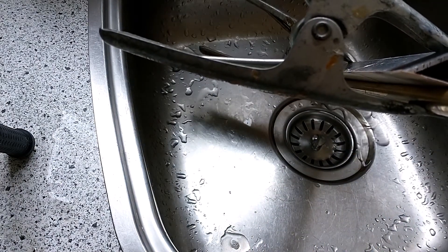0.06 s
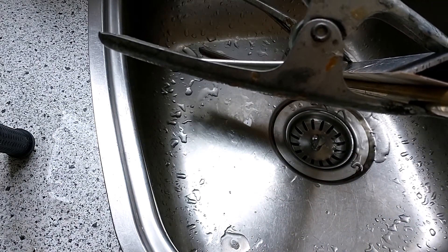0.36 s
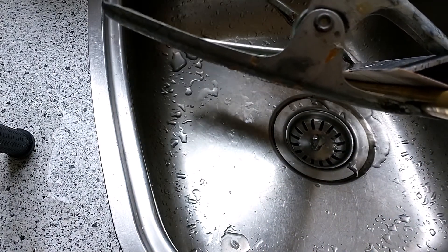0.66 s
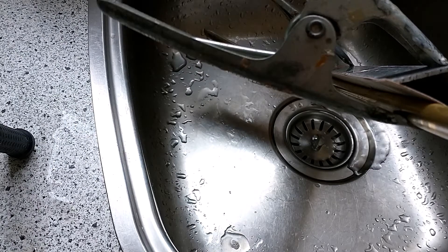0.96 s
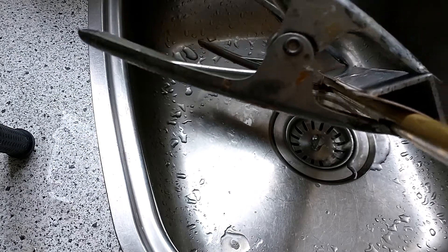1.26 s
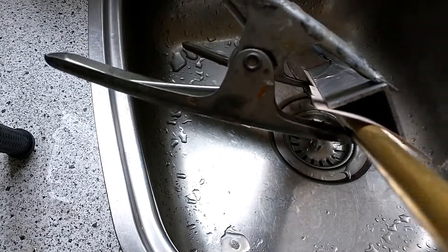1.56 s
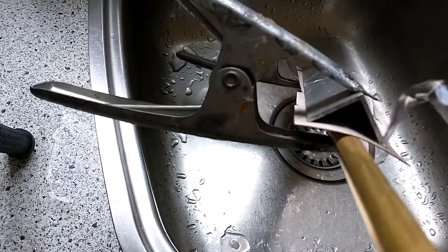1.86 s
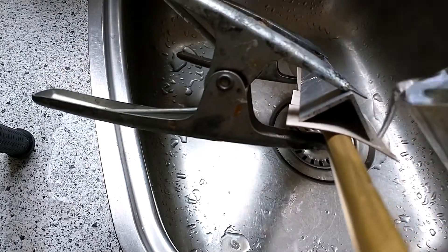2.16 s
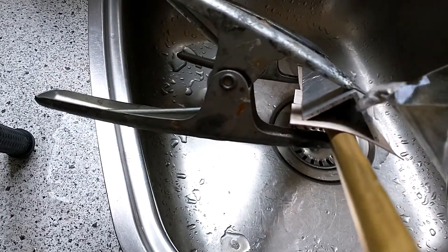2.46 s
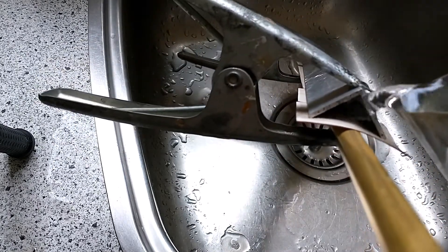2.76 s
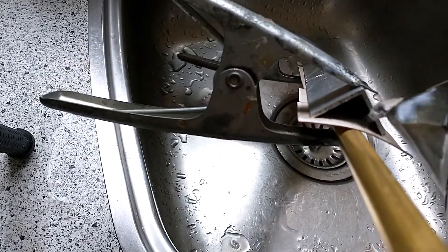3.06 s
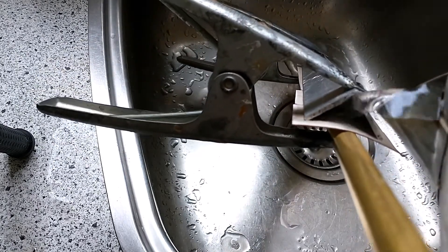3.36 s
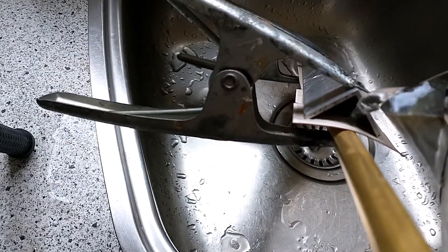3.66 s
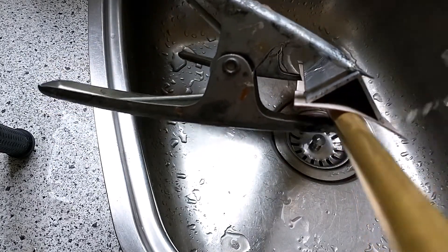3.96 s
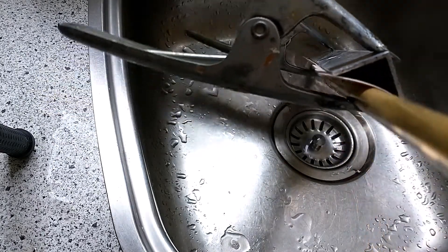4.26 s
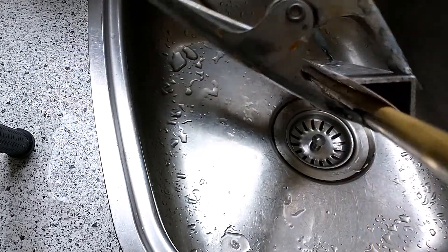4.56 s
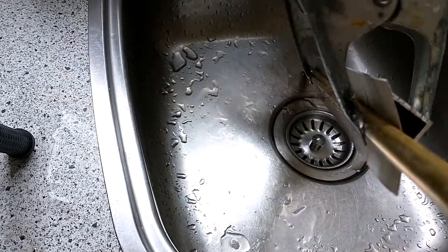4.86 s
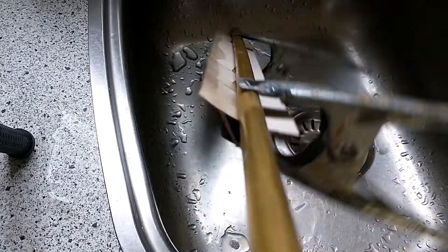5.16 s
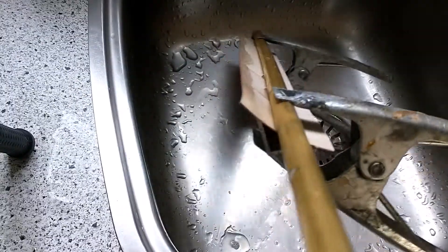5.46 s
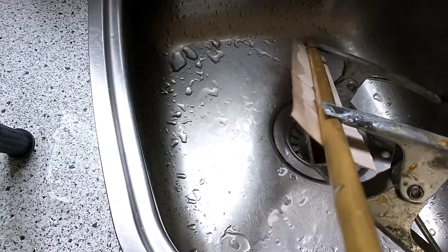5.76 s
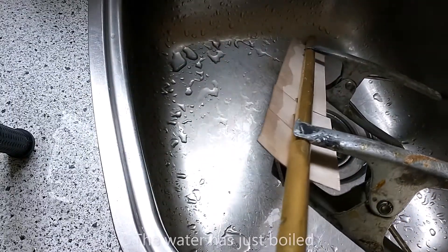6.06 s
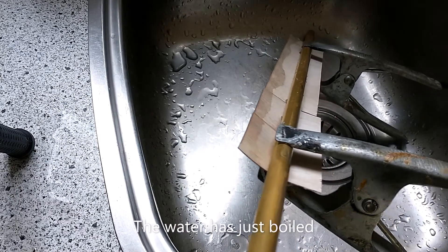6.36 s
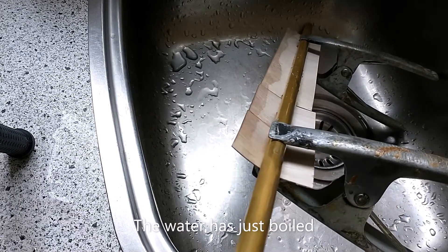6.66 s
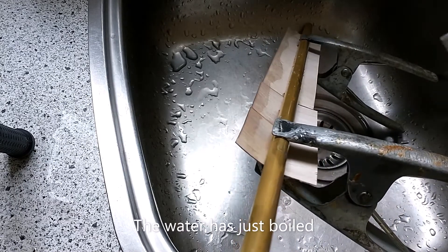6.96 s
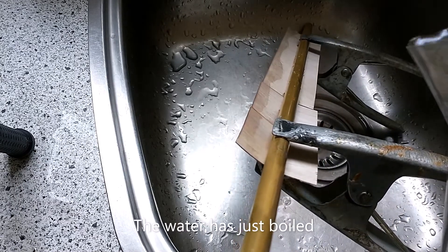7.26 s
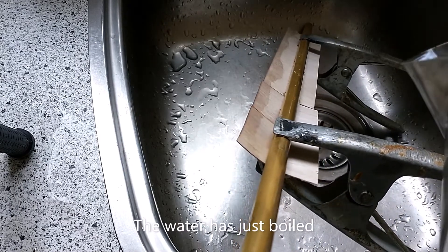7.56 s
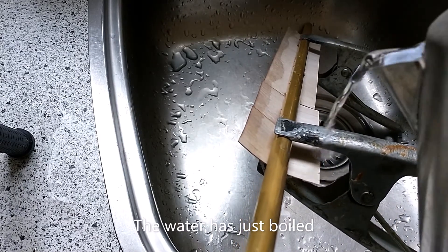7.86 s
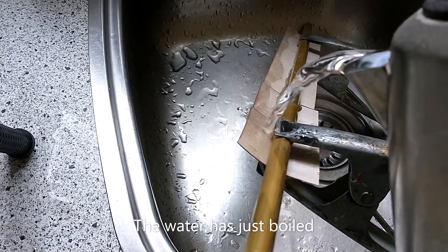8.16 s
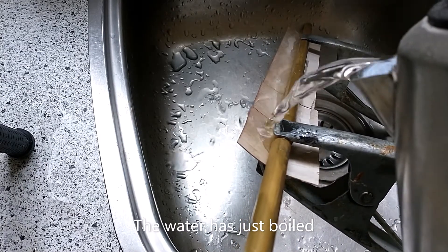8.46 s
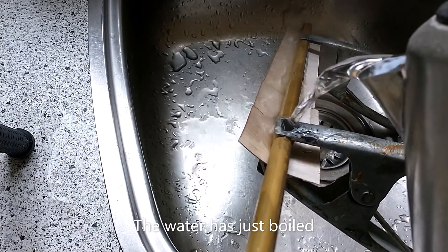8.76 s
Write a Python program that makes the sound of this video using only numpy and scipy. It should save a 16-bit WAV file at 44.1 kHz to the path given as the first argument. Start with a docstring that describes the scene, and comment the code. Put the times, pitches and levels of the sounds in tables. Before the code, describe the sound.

Heard close up at a steel kitchen sink, quiet drips and small splashes tick over a faint hum. Midway, a short scrape leads into a loud, clattering clank as a metal clamp and brass tube land, ringing the basin. A thin sliding squeal, a few lighter knocks and a brief drag follow. Soft dripping carries on, joined at the end by a faint fizz of poured water and a dull knock.

```python
"""Water drips and patters in a steel kitchen sink over a faint, dwindling hum. Near 5 s a steel spring
clamp holding a brass tube scrapes along the wall and drops in with a loud clank that rings the basin
and the tube. It slides with a thin squeal, rocks three times and drags to rest just after 6 s.
The water patters on; near the end a fresh pour fizzes and one dull knock sounds."""
import sys
import numpy as np
from scipy import signal
from scipy.fft import rfft, irfft, next_fast_len
from scipy.io import wavfile
from scipy.ndimage import map_coordinates

SR = 44100
rng = np.random.default_rng(int(sys.argv[2]) if len(sys.argv) > 2 else 0)


def generate_wav(signal):
    """Clip the signal to [-1, 1] and save it as 16-bit WAV at the path in sys.argv[1]."""
    frames = np.transpose(np.atleast_2d(signal))
    scaled = np.clip(frames, -1, 1) * 32767
    pcm = np.round(scaled).astype(np.int16)
    wavfile.write(sys.argv[1], SR, pcm)


N = 396868

# A mode is one note an object rings at; its ring time is how long it takes to fade by 60 dB.
# Levels in the tables are relative. Modes: (pitch [Hz], level [dB], ring time [s])
HOLLOW_MODES = [(234.9, -4, 0.31), (316, -11, 0.56), (433, -6.5, 0.23), (588, -2.5, 0.12), (682, 0.5, .12),
                (787.4, -12.5, 0.76), (884, -1.5, 0.17), (932, -3, 0.051)]  # the hollow of the basin
BASIN_MODES = [(88.6, -16.5, 0.96), (107, -2.5, .34), (167, -2, .5), (195.5, -5.5, 0.31), (244.2, -3, 0.5),
               (319.8, -1, .4), (384.3, -1, 0.21), (595, -8.5, 0.73), (730, -10, 0.57), (890.3, -15, .4),
               (928, -10, 0.26), (1036, -9, .7), (1041, -14.5, 0.55), (1316, -6, 0.44), (1620, -14.5, .4)]  # the basin's strongest notes
TUBE_MODES = [(1830, -11, .45), (2245, -11, .45), (3066, -9, .38), (3225, -11, .38), (3495, -9, .38),
              (3784, -8, .35), (4058, -8, .4), (4112, -8, .5), (4325, -10, .42), (5034, -11, .42),
              (5238, -9, .45), (6498, -10, .35), (7434, -12, .33), (8322, 2, .36), (8385, -6, .35),
              (8902, -9, .38)]  # the brass tube's bright ring
CLAMP_MODES = [(894, -9, .1), (1054, -9, 0.037), (1430, -6, 0.1), (1623, -1, 0.067), (2670, -8.5, 0.07),
               (2870, -4.5, 0.059), (4110, -2.5, 0.04), (4610, -4.5, 0.023), (4810, -7, 0.055),
               (7300, 0, .012)]  # the clamp's jaws
WALL_MODES = [(653, -12, 0.062), (1020, -12, 0.11), (1610, -3, .015), (2340, -5, .04), (4600, -4, .013),
              (6800, -5.5, 0.051)]  # the rubbed wall
RASP_MODES = [(722, -4.5, 0.14), (1020, -6.5, 0.19), (4730, 5.5, .0136), (7045, -10.5, 0.11),
              (7700, -9, 0.035)]  # the rasp around the squeal
BOTTOM_MODES = [(236.4, -1.5, 0.31), (321, -0.5, 0.15), (436, -6.5, 0.21), (645, -2.5, 0.1),
                (892, 1, 0.063), (1351, 2.5, 0.1), (1615, 2.5, 0.04), (2590, -4.5, .05)]  # the bottom under the dragged load
# How strong each noise is from low to high: (frequency [Hz], level [dB])
DRUMMING_COLOUR = [(25, -15.5), (50, -15.5), (80, -8), (160, -4.5), (235, -0.5), (350, -6.5), (520, -12),
                   (660, -8.5), (750, -17.5), (900, -3.5), (1100, -23.5), (2000, -37), (4000, -81.5)]  # water drumming on steel
PATTER_COLOUR = [(590, -32), (1000, -4.5), (1120, -9.5), (1430, -10), (1840, -5), (2120, -11), (3360, -13),
                 (4040, -14), (6130, -13.5), (10100, -18), (15800, -30.5)]  # fine spurts of water
LIGHT_GRIT_COLOUR = [(120, -58), (200, -32), (294, -11.5), (393, -20.5), (439, -9), (788, -17),
                     (1040, -12.5), (1220, -15.5), (1550, -8.5), (5470, -19), (7070, -12), (15800, -26)]  # metal sliding lightly
HEAVY_GRIT_COLOUR = [(41, -36.5), (70, -20), (135, -48.5), (238, -4), (375, -20.5), (631, -6), (740, -19.5),
                     (908, -6), (1140, -17), (1330, -15.5), (7140, -22.5), (15800, -41)]  # metal sliding under load
SHEET_COLOUR = [(25, -36.5), (50, -24), (75, -0.5), (120, 7.5), (300, 2), (500, -5.5), (1200, -7.5),
                (2200, -0.5), (3800, 0), (5600, -4), (8200, -5.5), (11000, -8.5), (15500, -17.5)]  # the steel sheet's crowd of weaker modes
# How long that crowd rings: (frequency [Hz], ring time [s])
SHEET_RING_TIMES = [(100, 0.36), (400, 0.71), (1000, 0.91), (2500, .6), (5000, 0.49), (8000, 0.51),
                    (14000, 0.28)]
# How alike left and right sound: (frequency [Hz], likeness [0 to 1])
WATER_LIKENESS = [(60, 1), (130, 0.66), (290, 0.52), (640, 0.17), (1400, 0.4), (8000, .15)]
METAL_LIKENESS = [(60, .92), (290, 0.81), (640, .27), (1400, 0), (15000, 0.032)]
# Soft splashes: (peak time [s], level [dB], rise and fall time [s], pitch [Hz])
SPLASHES = [(1.32, -62, 0.076, 850), (1.942, -49, 0.02, 810), (1.94, -58, 0.078, 460),
            (3.86, -59, 0.053, 450), (4.23, -61.5, 0.098, 630), (8.297, -64, .036, 395),
            (8.638, -64, .03, 344), (8.853, -61.5, 0.011, 2250)]
# The loudest drops: (time [s], level [dB], pitch [Hz])
LOUD_DROPS = [(0.1452, -53, 4160), (0.314, -55, 2780), (0.384, -54, 3950), (1.135, -53.5, 6160),
              (1.366, -54, 2900), (1.541, -56.5, 4080), (1.8238, -53, 2350), (1.9883, -50.5, 4000),
              (2.3043, -55, 2970), (2.4604, -44.5, 5900), (2.815, -55.5, 3500), (3.089, -50.5, 3400),
              (7.3795, -60, 3590), (8.2142, -56, 3970)]
# Metal rubbing on steel, one row each for scrape, groan, last catch, slide, squeal and drag:
# (start [s], rise [s], hold [s], level [dB])
STROKES = [(4.695, 0.22, 0.037, -46), (4.825, 0.041, 0.0087, -55), (4.927, 0.014, 0.012, -49),
           (5.153, 0.28, 0.17, -52.5), (5.292, .11, .17, -50), (6.15, 0.095, 0.049, -48)]
# Blows on the basin: (time [s], level [dB], thud [dB], treble [dB], crack [dB],
# ring length [share of the free ring], clamp [dB], pitch of the struck spot [Hz])
BLOWS = [(1.9337, -60, -9, -27, 4, .5, -10, 810), (5.0253, -20, -6, 7.5, -5, 0.21, -8, 11600),
         (5.0446, -20.5, 4, 6.5, 1, 0.93, -21, 8180), (5.0477, -23.5, -2.5, -1.5, 28.5, 0.22, -5, 3504),
         (5.0579, -28, -4, -11, -1, 0.5, -12, 3500), (5.083, -31, 4, 1.5, -3, 0.46, -14, 8350),
         (5.1032, -25, -14, -14, 2, .25, 1, 4650), (5.166, -40.5, 12, 7, 5, 0.78, -10, 2560),
         (5.6326, -50.5, 2.5, 1, 17, 0.64, 0.5, 2670), (5.8087, -40.5, -4.5, 1.5, -2.5, 0.24, -7, 6660),
         (5.814, -48.5, 1, -0.5, -7, 0.52, 4.5, 860), (6.013, -51.5, 8.5, -2.5, 11, 0.54, -2, 445.8),
         (8.783, -49, 0.5, -24.5, -10, 0.49, -17, 458.5)]

DRUMMING_DB, DRUMMING_FADE_DB_PER_S = -62.5, 1.14
PATTER_DB, PATTER_FADE_DB_PER_S = -68, .5
DRIP_HZ, DRIP_SPREAD_OCTAVES, DROP_DULL_HZ = 3700, 0.84, 10800
RELEASE_DB_PER_S = 270.5  # how fast a stroke dies away
TOP_HZ = 15850


def amp(db):
    """Turn decibels into a gain to multiply by."""
    return 10 ** (np.asarray(db) / 20)


def unit(x):
    """Scale a signal to an average strength (rms) of 1."""
    return x / np.sqrt(np.mean(x ** 2) + 1e-20)


def along(points, hz):
    """Read between the rows of a (frequency, value) table, on an octave scale."""
    freqs, values = np.transpose(points)
    return np.interp(np.log(hz + 1), np.log(freqs), values)


def wobble(rate):
    """A smooth curve through `rate` random values a second."""
    return map_coordinates(rng.standard_normal(int(N * rate / SR) + 4), [np.arange(N) * rate / SR])


def filtered(x, response):
    """Multiply each frequency in x by response(frequency)."""
    size = x.shape[-1]
    padded = next_fast_len(size + 8192)
    return irfft(rfft(x, padded) * response(np.fft.rfftfreq(padded, 1 / SR)), padded)[..., :size]


def uneven(x, depth_db, width_hz):
    """Make some narrow bands louder than their neighbours, in a fixed random ripple."""
    knots = np.arange(0, SR, width_hz)
    level_db = depth_db * rng.standard_normal(4096)[:len(knots)]
    return unit(filtered(x, lambda hz: amp(np.interp(hz, knots, level_db) * hz / (hz + 500))))


def noise(colour):
    """Two unrelated noises shaped by a colour table."""
    white = uneven(rng.standard_normal((2, N)), depth_db=3.5, width_hz=59)
    return unit(filtered(white, lambda hz: amp(along(colour, hz))))


def band(size, centre_hz, slope_db):
    """Two noises that weaken by slope_db for each octave away from a centre."""
    white = rng.standard_normal((2, size))
    return unit(filtered(white, lambda hz: amp(-slope_db * abs(np.log2((hz + 1) / centre_hz)))))


def add(out, start, x):
    """Mix x into out from `start` seconds on."""
    part = out[:, max(round(start * SR), 0):][:, :x.shape[-1]]
    part += x[:, :part.shape[1]]


def ring(modes, scatter_db):
    """One second of fading modes, drawn afresh for two listening directions."""
    t = np.arange(SR) / SR
    return sum(amp(db + scatter_db * rng.standard_normal((2, 1))) * amp(-60 * t / ring_s)
               * np.sin(2 * np.pi * (hz * t + rng.random((2, 1)))) for hz, db, ring_s in modes)


def rubbed(modes, size=N):
    """Modes kept ringing by a random force."""
    force = rng.standard_normal((2, size + SR - 1))
    return unit(signal.fftconvolve(force, ring(modes, scatter_db=0), 'valid', axes=1))


def spread(pair, likeness):
    """Blend two signals into left and right: long waves reach both microphones alike."""
    turn = lambda hz: np.arccos(np.clip(along(likeness, hz), -1, 1)) / 2
    mid, side = filtered(pair, lambda hz: np.array([np.cos(turn(hz)), np.sin(turn(hz))]))
    return np.array([mid + side, mid - side])


def stroke(start, rise, hold, db, held_db_per_s=-50):
    """Loudness of one rub or pour: it builds evenly, drifts while held and dies away."""
    t = np.arange(N) / SR - start
    held = np.clip(t - rise, 0, hold)
    released = np.maximum(t - rise - hold, 0)
    return np.clip(t / rise, 0, 1) * amp(db + held_db_per_s * held - RELEASE_DB_PER_S * released)


def hum(drum_gain):
    """A faint, fuzzy hum stands in the basin's hollow, stronger while the water drums."""
    return (amp(-74.5) + amp(-5.5) * drum_gain) * rubbed(HOLLOW_MODES)


def running_water(drum_gain, patter_gain):
    """Water drums on the steel and patters in tiny spurts."""
    drumming = drum_gain * amp(1.1 * wobble(14)) * noise(DRUMMING_COLOUR)
    patter = patter_gain * amp(0.65 * wobble(25) + 1.3 * wobble(340)) * noise(PATTER_COLOUR)
    return drumming + patter


def fresh_pour():
    """Hot water lands on the metal and fizzes."""
    pour = stroke(start=7.6, rise=.6, hold=.85, db=-78.5, held_db_per_s=2)
    flicker = amp(1.5 * wobble(12) + 2.5 * wobble(200))
    return pour * flicker * band(N, centre_hz=10500, slope_db=13)


def spatter(patter_gain, count=700):
    """Droplets, mostly tiny, each ping for a few cycles; they fade with the patter."""
    out, t = np.zeros((2, N)), np.arange(SR // 100) / SR
    for when, pitch, size, phase in rng.random((count, 4)):
        hz = 1700 * 5.5 ** pitch
        ping = np.sin(2 * np.pi * (hz * t + np.array([[0], [phase]]))) * np.exp(-t * hz / 2)
        at = int(when * (N - 1))
        add(out, at / SR, patter_gain[at] * amp(5 + 12 * size ** 3) * ping)
    return out


def splashes():
    """Water slops against the basin and makes its hollow sound."""
    out, t = np.zeros((2, N)), np.arange(SR) / SR
    for peak_s, db, width_s, hz in SPLASHES:
        swell = np.exp(-abs(t - .5) / width_s)
        spray = filtered(band(SR, hz, slope_db=9), lambda f: 1 / (1 + (f / 4500) ** 2))
        near_pitch = lambda f: amp(-14 * abs(np.log2((f + 1) / hz)))
        hollow = unit(filtered(rubbed(HOLLOW_MODES, SR), near_pitch))
        add(out, peak_s - .5, amp(db) * swell * (amp(-0.5) * spray + amp(1.5) * hollow))
    return out


def small_drops(drum_gain, patter_gain, count=36):
    """Random drops, rarer as the flow dwindles: rows of (time [s], level [dB], pitch [Hz])."""
    when, size, pitch = rng.random((count, 3)).T
    at = np.searchsorted(np.cumsum(drum_gain) / drum_gain.sum(), when)
    db = 20 * np.log10(patter_gain[at]) + 4 + 5 * size
    hz = DRIP_HZ * 2 ** (DRIP_SPREAD_OCTAVES * (2 * pitch - 1))
    return list(zip(at / SR, db, hz))


def drop_ticks(drops):
    """Single drops tick on the metal; a drop is soft, so its highest treble is weak."""
    out, t = np.zeros((2, N)), np.arange(SR // 8) / SR
    for start, db, hz in drops:
        snap, echo = amp(-60 * t / 0.013), amp(-13.5 - 60 * t / 0.16)
        hiss = filtered(band(len(t), hz, slope_db=8), lambda f: 1 / (1 + (f / DROP_DULL_HZ) ** 4))
        add(out, start, amp(db - 1) * (snap + echo) * hiss)
    return out


def stick_slip(hz, waver):
    """Metal sticks and slips so quickly that it sings a wavering tone."""
    phase = 2 * np.pi * hz * np.arange(N) / SR + waver * wobble(35)
    return unit(np.array([np.sin(phase), np.cos(phase)]) * amp(2 * wobble(50)))


def scraping():
    """Sliding metal catches unevenly on the steel: it grates, rings the rubbed part and sings."""
    scrape, groan, catch, slide, squeal, drag = [stroke(*row) for row in STROKES]
    catching = unit(amp(.8 * wobble(60) + wobble(600)))
    wall = amp(0.5) * scrape * noise(LIGHT_GRIT_COLOUR)
    wall += (amp(-1.5) * scrape + catch) * rubbed(WALL_MODES)
    wall += (groan + amp(-17.5) * scrape) * stick_slip(hz=436, waver=.7)
    bottom = amp(-2) * slide * noise(LIGHT_GRIT_COLOUR)
    bottom += squeal * (stick_slip(hz=1044, waver=0.35) + amp(-3) * rubbed(RASP_MODES))
    bottom += drag * (amp(-3.5) * noise(HEAVY_GRIT_COLOUR) + rubbed(BOTTOM_MODES))
    return catching * (wall + bottom)


def sheet_ring(crowd, thud_db, treble_db, ring_share):
    """The sheet's many modes fade like noise; a heavy blow gives more bass, a hard one more treble."""
    hz, when, spectrum = signal.stft(crowd, SR, nperseg=512)
    tilt = amp(thud_db / (1 + (hz / 330) ** 2) + treble_db / (1 + (6000 / (hz + 1)) ** 2))
    colour = unit(amp(along(SHEET_COLOUR, hz))) * tilt
    fade = amp(-60 * when / (ring_share * along(SHEET_RING_TIMES, hz)[:, None]))
    return signal.istft(spectrum * colour[:, None] * fade, SR, nperseg=512)[1][:, :SR]


def damped(modes, ring_share):
    """A hand or a resting edge shortens the ring, least for the lowest, whole-body modes."""
    return [(hz, db, ring_s * ring_share ** min(hz / 250, 1)) for hz, db, ring_s in modes]


def clanks():
    """Each blow cracks, rings the basin and the tube, and rattles the clamp's jaws."""
    out, t = np.zeros((2, N)), np.arange(SR) / SR
    crowds = uneven(rng.standard_normal((len(BLOWS), 2, SR)), depth_db=3.5, width_hz=55)
    onset = 1 - np.exp(-t / .0012)
    for crowd, blow in zip(crowds, BLOWS):
        start, db, thud_db, treble_db, crack_db, ring_share, clamp_db, spot_hz = blow
        sheet = sheet_ring(crowd, thud_db, treble_db, ring_share)
        # the crack is too brief to carry bass
        crack = amp(crack_db - 60 * t / 0.012) * filtered(sheet, lambda f: f / (f + 300))
        basin = amp(thud_db - 9.5) * ring(damped(BASIN_MODES, ring_share), scatter_db=1)
        tube_gain = amp(treble_db - 10.5) * ring_share ** 2
        tube = tube_gain * ring(damped(TUBE_MODES, ring_share), scatter_db=0.5)
        jaws = amp(clamp_db - 60 * t / (0.48 * ring_share)) * rubbed(CLAMP_MODES, SR)
        # the struck spot favours one group of modes
        spot = amp(-0.5 - 60 * t / (0.39 * ring_share)) * band(SR, spot_hz, slope_db=90)
        add(out, start, amp(db) * onset * (sheet + crack + basin + tube + jaws + spot))
    return out


def scene():
    """The metal lies in the middle; the water is to the left and reaches that microphone first."""
    t = np.arange(N) / SR
    drum_gain = amp(DRUMMING_DB - DRUMMING_FADE_DB_PER_S * t)
    patter_gain = amp(PATTER_DB - PATTER_FADE_DB_PER_S * t)
    metal = spread(clanks() + scraping(), METAL_LIKENESS) * amp([[.2], [-.2]])
    water = running_water(drum_gain, patter_gain) + fresh_pour() + splashes()
    water += drop_ticks(LOUD_DROPS + small_drops(drum_gain, patter_gain))
    water += spatter(patter_gain) + hum(drum_gain)
    left, right = spread(water, WATER_LIKENESS) * amp([[1.1], [-1.1]])
    delay_s = .00047
    late_right = filtered(right, lambda hz: np.exp(-2j * np.pi * hz * delay_s))
    return metal + np.array([left, late_right])


def record(dry):
    """The microphone clips at full scale and loses the deep bass and the highest treble."""
    low_cut = signal.butter(3, 52, 'highpass', fs=SR, output='sos')
    thinned = signal.sosfilt(low_cut, np.clip(dry, -1, 1))
    return filtered(thinned, lambda hz: np.clip((TOP_HZ + 150 - hz) / 300, 0, 1))


dry = scene()
out = record(dry)
generate_wav(out)
```